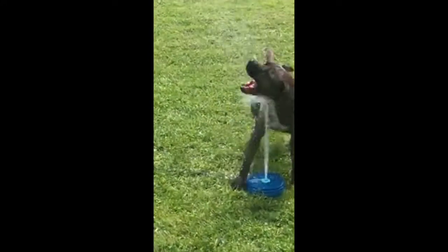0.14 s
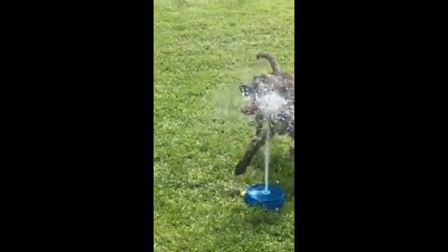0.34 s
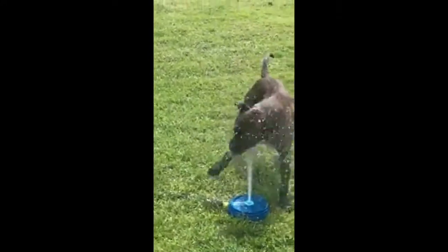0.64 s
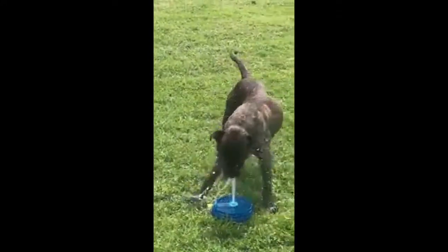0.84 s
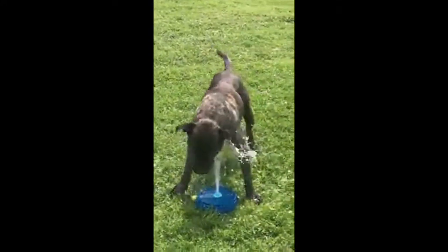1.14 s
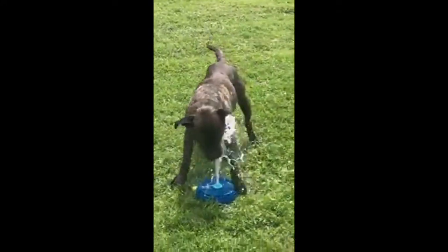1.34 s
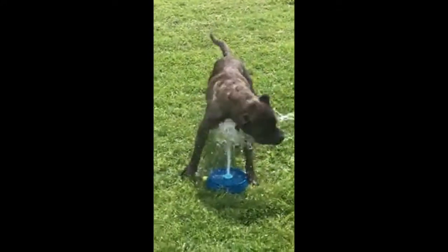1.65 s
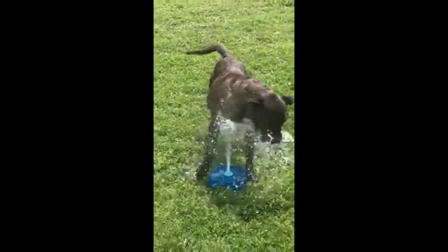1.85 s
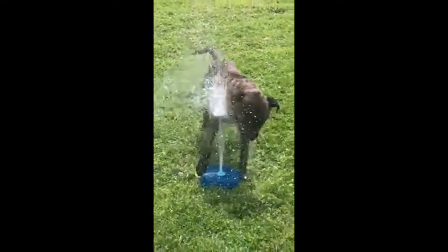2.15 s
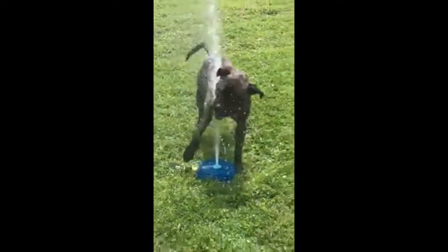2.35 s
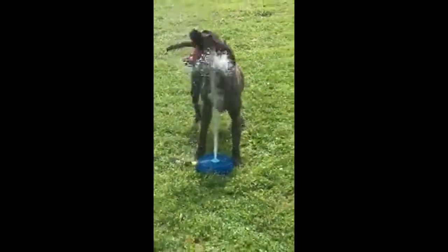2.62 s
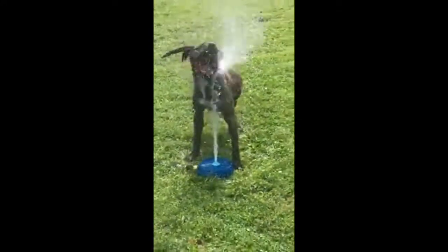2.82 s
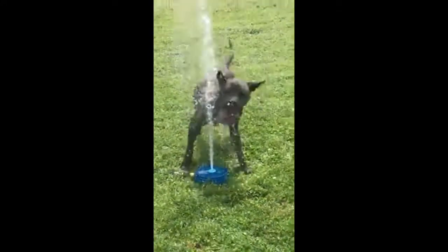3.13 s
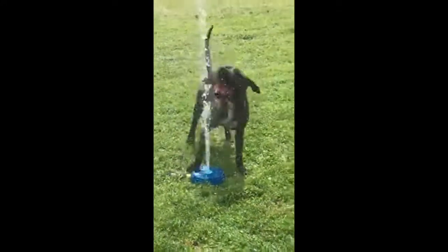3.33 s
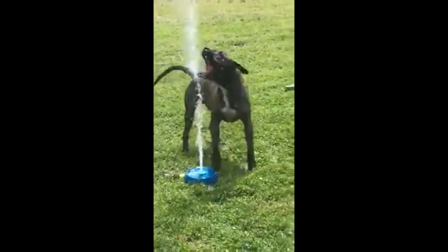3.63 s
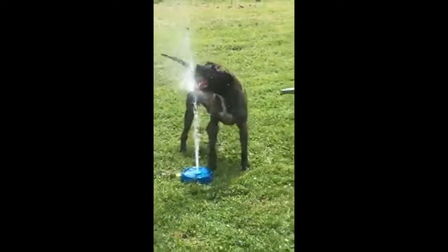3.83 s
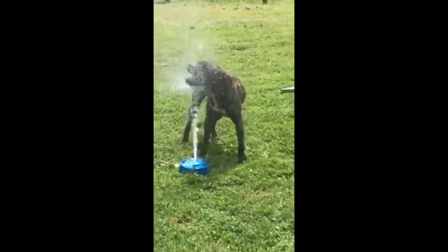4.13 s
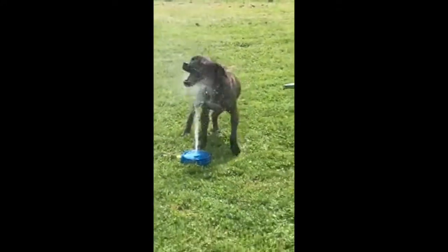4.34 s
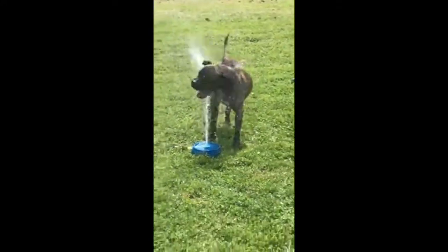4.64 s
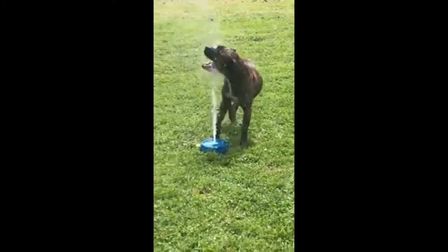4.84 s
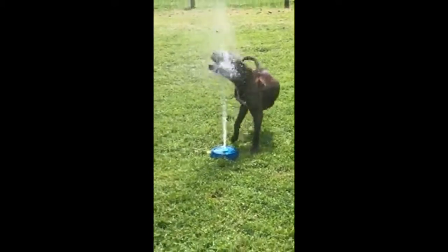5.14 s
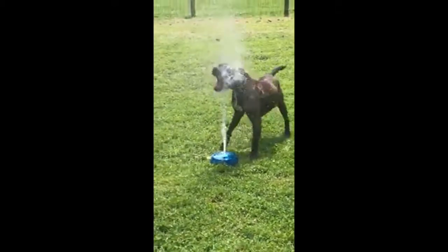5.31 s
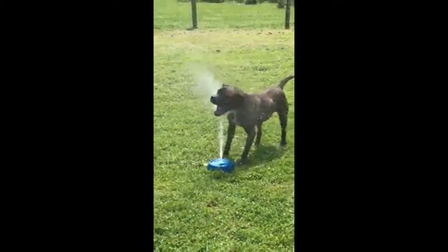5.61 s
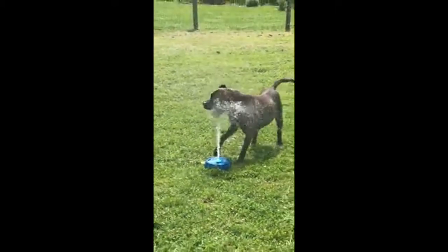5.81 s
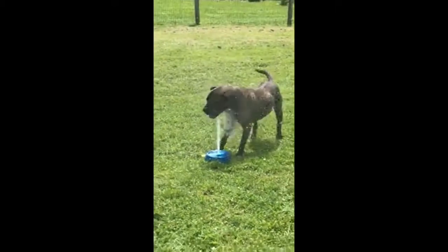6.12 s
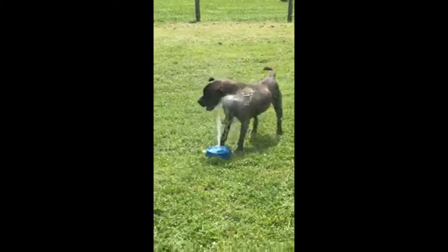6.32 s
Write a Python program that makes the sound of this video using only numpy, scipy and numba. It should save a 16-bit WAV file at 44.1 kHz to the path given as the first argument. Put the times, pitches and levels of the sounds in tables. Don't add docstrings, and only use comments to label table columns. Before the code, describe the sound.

Uneven spray from an upright water jet slaps and gushes against a dog's mouth and wet coat while low wind rumbles over the microphone.

```python
import sys
import numpy as np
from scipy import signal
from scipy.fft import rfft, irfft, dct, next_fast_len
from scipy.io import wavfile
from scipy.ndimage import uniform_filter1d
from numba import njit

SR = 44100
rng = np.random.default_rng(int(sys.argv[2]) if len(sys.argv) > 2 else 0)


def master_out(mix):
    frames = np.transpose(np.atleast_2d(mix))
    ceiling = np.clip(frames, -1, 1)
    pcm = np.round(ceiling * 32767).astype(np.int16)
    wavfile.write(sys.argv[1], SR, pcm)


def gain_from_db(level_db):
    decades = np.asarray(level_db, float) / 20
    return 10 ** decades


N = 285313


def rms_one(x):
    return x / np.sqrt(np.mean(x ** 2) + 1e-20)


def in_time(rows):
    s, *columns = np.transpose(rows)
    return [np.interp(np.arange(N) / SR, s, c) for c in columns]


def per_sample(slow):
    return np.interp(np.arange(N) / 64, np.arange(len(slow)), slow)


def band(x, low_hz, high_hz, order=2):
    return signal.sosfilt(signal.butter(order, [low_hz, min(high_hz, .45 * SR)], "band", fs=SR, output="sos"), x)


def colour(x, points):
    hz, db = np.transpose(points)
    grid = np.fft.rfftfreq(N, 1 / SR) + 1
    return irfft(rfft(x) * gain_from_db(np.interp(np.log(grid), np.log(hz), db)), N)


def drift(rate):
    r = np.exp(-80 * np.pi * rate / SR)
    slow = signal.lfilter([1], [1, -2 * r, r * r], rng.standard_normal(N // 40 + 2002))[2000:]
    return np.interp(np.arange(N) / 40, np.arange(len(slow)), rms_one(slow))


def swell(start, end):
    at, size = round(max(start, 0) * SR), round((end - start) * SR)
    return at, np.sqrt(np.sin(np.pi * (np.arange(size) + .5) / size))


def humps(middles, lengths, flat):
    t = np.arange(0, N + 64, 64) / SR - middles[:, None]
    return np.exp(-np.abs(2 * t / lengths[:, None]) ** flat)


def heap(base_db, shapes, peaks_db):
    bursts = per_sample(gain_from_db(peaks_db) ** 2 @ shapes ** 2)
    return 10 * np.log10(gain_from_db(base_db) ** 2 + bursts)


def steady(x, over_s):
    return x / np.sqrt(uniform_filter1d(x ** 2, size=round(over_s * SR)) + 1e-12)


def droplets(per_s, spread_db):
    sizes = gain_from_db(spread_db * np.minimum(rng.exponential(1, N), 4)) * rng.standard_normal(N)
    return rms_one(sizes * (rng.random(N) < per_s / SR))


@njit
def cavity(x, hz, r, sr):
    y = np.zeros(len(x))
    for i in range(2, len(x)):
        y[i] = x[i] - x[i - 2] + 2 * r * np.cos(2 * np.pi * hz[i] / sr) * y[i - 1] - r * r * y[i - 2]
    return y


def ring(drops, first_hz, last_hz, r):
    glide = np.linspace(first_hz, last_hz, len(drops))
    once = cavity(drops, glide, r, SR)
    return rms_one(cavity(once, glide, r, SR))


# time in seconds, spray level in dB, depth of the body in the jet in dB.
JET_ON_DOG = [(0, -47.5, -1), (.24, -48.5, -7.5), (.36, -42.5, -5), (.62, -39, -8), (.88, -43.5, -17.5),
              (1.0, -43, -18), (1.64, -48.5, -14.5), (2.11, -40.5, -4), (2.5, -42.5, -13.5),
              (2.69, -49.5, -7), (3.1, -40, -10), (3.3, -45, -2.5), (3.35, -55, -4), (3.77, -55, -2.5),
              (3.91, -42, -10), (4.74, -43.5, -1.5), (4.88, -50.5, -3.5), (5.3, -42.5, -8.5),
              (6.47, -46, -9)]
# middle in seconds, length in seconds, change in dB.
SURGES = [(0.6, 0.086, -0.5), (0.666, 0.071, 0), (0.812, 0.073, 3.5), (0.964, 0.071, 8), (1.26, 0.055, 0),
          (2.796, 0.096, 3.5), (3.083, 0.036, 0.5), (3.384, 0.046, 6.5), (3.843, 0.013, -5),
          (4.218, 0.068, 2.5), (5, 0.042, -2.5), (5.1, 0.095, 5.5), (5.352, 0.038, 3.5), (5.608, 0.061, 3),
          (5.853, 0.13, -1.5), (6.134, .1, 0), (6.314, 0.25, -2.5)]
# middle in seconds, length in seconds, slap level in dB,
# muzzle over slap in dB.
SPLASHES = [(0.005, 0.12, -55, 12.5), (0.432, 0.075, -41.5, -9.5), (0.52, 0.12, -46.5, -2.5),
            (0.704, 0.18, -40, -10), (0.932, 0.49, -47.5, -4), (1.103, 0.24, -45, -9.5),
            (1.221, 0.17, -42.5, -7), (1.374, 0.08, -46, 0.5), (1.484, 0.4, -49, 3.5),
            (1.708, 0.98, -50.5, -2.5), (2.04, 0.12, -44.5, -5.5), (2.23, 0.16, -44.5, -22),
            (2.867, 0.29, -48, -31), (3.17, 0.096, -42.5, -15), (3.286, 0.069, -42, -17),
            (3.398, 0.015, -51, -17), (4.27, 0.12, -45.5, 3.5), (4.405, 0.076, -46, -8), (4.61, .2, -57, 0),
            (5.057, 0.039, -52, -5), (5.19, 0.14, -53, -10), (5.683, 0.071, -43.5, -12),
            (6.265, 0.42, -53, -4)]


def jet_levels():
    spray_db, depth_db = in_time(JET_ON_DOG)
    s, length, change_db = np.transpose(SURGES)
    spray_db = spray_db + per_sample(change_db @ humps(s, length, flat=2.5))
    s, length, db, muzzle_over_db = np.transpose(SPLASHES)
    shapes = humps(s, length, flat=1.16)
    coat_db = heap(spray_db + 0.5 + 0.35 * depth_db, shapes, db - 6)
    slap_db = heap(spray_db + depth_db, shapes, db)
    low_db = -57 + 0.32 * (spray_db + depth_db + 53.5)
    muzzle_db = heap(low_db, shapes, db + muzzle_over_db)
    return spray_db, coat_db, slap_db, muzzle_db


def patches(x, patchy_db):
    edges = 1500 * 2 ** np.arange(0, 3.7, 1 / 3)
    out = np.zeros(N)
    for k, (low, high) in enumerate(zip(edges, edges[1:])):
        out += (-1) ** k * band(x, low, high) * gain_from_db(patchy_db * drift(4.0))
    return out


# time in seconds, lag in milliseconds, strength from 0 to 1.
ECHO = [(0, 1.1, 0.16), (.65, 1.22, 0.01), (.95, 0.87, 0.15), (1.2, 0.71, 0.07), (1.75, 0.89, 0.06),
        (2.2, 0.82, 0.3), (2.35, 1.3, 0.18), (2.8, 1.15, 0), (3.2, 1.05, 0.1), (3.6, 1.7, 0.5),
        (4.1, 1.3, .25), (4.4, 1.22, .3), (4.55, 1.15, .6), (4.72, 1.06, .65), (4.85, 1.0, .1),
        (5.9, 0.82, 0), (6.2, 0.72, 0.2), (6.47, 0.69, 0.3)]


def lawn_echo(x):
    lag_ms, strength = in_time(ECHO)
    strength = np.clip(strength * (1 + 0.61 * drift(6.5)), 0, 1)
    late = np.interp(np.arange(N) - lag_ms * SR / 1000, np.arange(N), x)
    dull = signal.sosfilt(signal.butter(1, 6000, fs=SR, output="sos"), late)
    return (x + strength * dull) / np.sqrt(1 + strength ** 2)


# frequency in Hz, density in dB per Hz.
JET_TONE = [(880, -35), (1500, 18), (2010, 5.5), (3120, 6.5), (4470, 3.5), (4880, -1.5), (6930, 3),
            (7640, -3), (8580, 1), (10200, 0), (11900, 3), (15400, -2)]


def spray():
    mist_db, coat_db, slap_db, _ = jet_levels()
    stream = droplets(22000, 1.6)
    drops = patches(colour(stream, JET_TONE[1:]), patchy_db=2.0)
    sputter = 0.07 * drift(24) + 2.0 * drift(110)
    mist = rms_one(band(drops, 7980, 20000, order=4)) * gain_from_db(mist_db + 0.3 * sputter)
    coat = rms_one(band(drops, 4933, 8300, order=4)) * gain_from_db(coat_db + 0.57 * sputter + .5 * drift(27))
    slap = rms_one(band(drops, 2170, 4780, order=4)) * gain_from_db(slap_db + 0.14 * sputter + 1.6 * drift(43))
    return mist + lawn_echo(coat + slap)


def muzzle():
    level_db = jet_levels()[3]
    dull_db = -66 + 0.72 * (level_db + 48.0)
    flat = rms_one(band(droplets(9000, 2.4), 862, 2140, order=3))
    dull = rms_one(band(droplets(9000, 1.8), 495, 690, order=3))
    return (gain_from_db(level_db) * flat + gain_from_db(dull_db) * dull) * gain_from_db(1.58 * drift(28))


# start in seconds, end in seconds, first pitch in Hz, last pitch in Hz, level in dB.
HOLLOWS = [(0, 0.084, 1050, 1040, -47), (0, 0.12, 1710, 1870, -50), (0.03, 0.142, 2460, 2600, -47.5),
           (0.41, 0.533, 633, 589, -48.5), (0.43, 0.52, 1150, 1250, -47), (0.51, 0.578, 1400, 1290, -45),
           (0.63, 0.737, 2980, 3340, -45), (0.63, 0.777, 3520, 3940, -48), (0.63, 0.73, 4540, 4600, -48),
           (0.64, 0.72, 2210, 2260, -56), (0.404, 0.52, 2440, 2500, -56), (0.027, 0.14, 3200, 3330, -48),
           (0.864, 0.935, 1800, 1690, -51), (1.485, 1.545, 2270, 2170, -46), (1.62, 1.742, 2520, 2450, -48),
           (3.136, 3.3, 1710, 1680, -60), (0.849, 0.983, 1170, 995, -43.5), (1.082, 1.338, 2710, 2980, -48),
           (1.34, 1.546, 1050, 970, -49), (1.333, 1.43, 2490, 2140, -43), (1.35, 1.562, 2800, 3030, -49),
           (1.617, 1.837, 1070, 1050, -48.5), (1.782, 2.11, 2270, 2500, -47),
           (1.822, 2.1, 3140, 3160, -46.5), (1.83, 2.02, 4300, 4140, -48), (3.137, 3.32, 3000, 3270, -47),
           (4.163, 4.236, 660, 700, -46), (4.213, 4.28, 880, 935, -44), (4.182, 4.31, 1290, 1480, -42.5),
           (4.198, 4.28, 2380, 2670, -42.5), (4.22, 4.29, 2160, 1950, -45),
           (4.515, 4.732, 1630, 2140, -49.5), (4.5, 4.74, 2500, 2770, -50), (4.4, 4.58, 3530, 3400, -52),
           (4.562, 4.736, 3330, 3940, -46.5), (4.57, 4.75, 4300, 4950, -60),
           (5.966, 6.114, 3900, 3450, -56), (6.186, 6.327, 2730, 2850, -50.5),
           (6.188, 6.328, 4050, 4050, -55)]


def hollows():
    out, drops, throb = np.zeros(N), droplets(6000, 2.5), gain_from_db(1.3 * drift(50))
    for start, end, first_hz, last_hz, db in HOLLOWS:
        width_hz = 190 + 0.012 * first_hz
        at, shape = swell(start, end)
        here = slice(at, at + len(shape))
        r = np.exp(-1.4 * np.pi * width_hz / SR)
        out[here] += gain_from_db(db) * shape * throb[here] * ring(drops[here], first_hz, last_hz, r)
    return out


# start in seconds, end in seconds, first pitch in Hz,
# last pitch in Hz, level in dB.
GUSHES = [(0, .12, 1700, 1900, -45), (0.438, .58, 1000, 1290, -51.5), (0.628, .74, 3240, 3450, -45),
          (.855, 0.963, 1430, 1200, -51), (1.338, 1.42, 2900, 2680, -42), (1.343, 1.43, 1910, 1800, -42),
          (1.34, 1.553, 1200, 1200, -55), (1.643, 1.817, 1410, 1200, -53), (2.0, 2.094, 2800, 2560, -48),
          (4.173, 4.297, 895, 1300, -52), (4.197, 4.308, 2180, 2500, -48), (4.37, 4.43, 3900, 3700, -46),
          (4.542, 4.57, 2200, 2200, -48)]


def gushes():
    width_hz, rise_s = 900, .008
    out, drops = np.zeros(N), droplets(3500, 3.0)
    r = np.exp(-np.pi * width_hz / SR)
    for start, end, first_hz, last_hz, db in GUSHES:
        at, size = round(max(start, 0) * SR), round((end - start) * SR)
        step = np.arange(size)
        drain = np.sqrt(np.cos(np.pi / 2 * step / size))
        shape = np.minimum(step / (rise_s * SR), 1) * drain
        out[at:at + size] += gain_from_db(db) * shape * ring(drops[at:at + size], first_hz, last_hz, r)
    return out


# time in seconds, peak in dB.
SNAPS = [(2.057, -22), (2.816, -40), (3.072, -36), (3.6375, -18), (3.6535, -33), (3.676, -35), (3.739, -45),
         (4.706, -25), (4.5328, -22), (4.553, -37), (5.3507, -32), (6.135, -34.5)]


def snaps():
    out, t = np.zeros(N), np.arange(400) / SR
    for s, peak_db in SNAPS:
        at = round(s * SR)
        burst = rng.standard_normal(400) * np.exp(-t / .0022)
        crack = band(burst, 2400, 3800) + .55 * band(burst, 4200, 6500) + .25 * band(burst, 6800, 9000)
        out[at:at + 400] += gain_from_db(peak_db - 5.5) * crack / np.abs(crack).max()
    return out


# time in seconds, level in dB, bite (how hard it flaps) in dB.
BREEZE = [(0, -43.5, -9), (.35, -47.5, 5), (.77, -48, -13), (.95, -32.5, -7), (1.5, -38.5, -14.5),
          (2.0, -31, -5.5), (2.2, -39.5, -13.5), (2.55, -32.5, -14), (3.0, -53, -5), (3.25, -64, 3),
          (3.45, -45, -13), (3.92, -50.5, -12), (4.4, -47, -7.5), (4.65, -39.5, -18), (4.95, -56, -4),
          (5.3, -50, -9), (5.75, -39, -18), (6.47, -41.5, 8)]
# middle in seconds, length in seconds, strength in dB, bite in dB.
GUSTS = [(0.125, 0.11, -35, -17), (0.894, 0.16, -51, -2), (4.037, 0.11, -42.5, -9),
         (5.585, 0.11, -45, -8.5), (0.297, 0.12, -30, -3.5), (0.472, 0.13, -33, -5.5),
         (0.625, 0.16, -39.5, -1), (1.097, 0.1, -30, 3.5), (1.227, 0.12, -27, -3), (1.388, 0.15, -30, -0.5),
         (1.542, 0.075, -38.5, -1), (1.65, 0.093, -34, -2), (1.752, 0.1, -27.5, -1.5),
         (1.818, 0.049, -22, -4), (1.892, 0.042, -31, -6), (2.045, 0.096, -32.5, 8.5),
         (2.376, 0.17, -33, -14), (2.656, 0.062, -30, 1), (2.8, 0.13, -22, -7), (2.924, 0.079, -23.5, -8),
         (3.057, 0.11, -32.5, -7.5), (3.125, 0.1, -29.5, -7.5), (3.285, 0.13, -33.5, -16),
         (5.952, .07, -36, -1.5), (4.263, 0.069, -36, -14), (4.51, 0.076, -32.5, -10),
         (4.584, 0.043, -28.5, -10.5), (4.711, 0.077, -33, -10.5), (4.818, 0.029, -39, -30),
         (5.875, 0.046, -23.5, -9), (6.115, 0.1, -27.5, -4.5), (6.317, 0.21, -27, -3.5),
         (6.48, 0.081, -29, 6.5)]
# middle in seconds, length in seconds, level in dB.
TEARS = [(0.28, .1, -58), (0.515, 0.027, -48.5), (1.229, 0.059, -44.5), (1.408, 0.047, -41),
         (1.682, 0.11, -48), (1.778, 0.11, -44.5), (2.027, 0.064, -60), (2.22, 0.13, -56),
         (4.95, 0.15, -58.5), (2.66, 0.047, -54), (2.803, 0.049, -45), (2.92, 0.05, -66),
         (3.03, 0.017, -41.5), (5.882, .05, -51), (5.938, 0.044, -52), (6.108, 0.072, -46),
         (6.238, 0.04, -41), (6.332, 0.095, -35.5), (6.45, 0.11, -38)]
# middle in seconds, length in seconds, level in dB.
THUMPS = [
    (0.27, 0.026, -26),
    (1.25, 0.033, -28),
    (1.813, 0.035, -20.5),
    (2.672, 0.045, -24),
    (2.915, 0.036, -24),
    (4.832, 0.049, -26.5),
    (5.893, 0.032, -32),
    (6.085, 0.099, -25),
    (6.29, 0.027, -33),
]


def wind_levels():
    breeze_db, breeze_bite_db = in_time(BREEZE)
    s, length, db, bite_db = np.transpose(GUSTS)
    buffet_db = heap(breeze_db, humps(s, length, flat=6.5), db)
    flap_db = heap(breeze_db + breeze_bite_db, humps(s, 1.04 * length, flat=4.5), db + bite_db)
    s, length, db = np.transpose(TEARS)
    flutter_db = heap(-56 + 0.64 * (flap_db + 32), humps(s, length, flat=6.2), db)
    s, length, db = np.transpose(THUMPS)
    deep_db = heap(-34.5 + 0.52 * (buffet_db + 32.5), humps(s, length, flat=4.9), db)
    return buffet_db, deep_db, flap_db, flutter_db


# frequency in Hz, density in dB per Hz.
WIND_TONE = [(12, -39), (20, -9), (54, 12.5), (81, 3), (183, -9.5), (236, -14), (375, -19.5), (499, -37.5),
             (780, -44.5), (900, -46), (1170, -63), (1980, -120)]


def wind():
    buffet_db, deep_db, flap_db, flutter_db = wind_levels()
    air, lumps = rms_one(colour(rng.standard_normal(N), WIND_TONE)), drift(37)
    deep = steady(band(air, 36, 78), 0.14) * gain_from_db(deep_db - 1.5 + 1.5 * lumps)
    buffet = steady(band(air, 78.8, 141.3, order=3), 0.072) * gain_from_db(buffet_db + 2.2 * lumps)
    flap = steady(band(air, 150, 255, order=3), 0.067) * gain_from_db(flap_db + 2.4 * lumps)
    flutter = steady(band(air, 410, 850, order=3), 0.054) * gain_from_db(flutter_db + 1.5 * lumps)
    pushed = .4 * np.tanh((deep + buffet + flap) / .4)
    return pushed + flutter


# time in seconds, peak in dB.
PUFFS = [
    (2.777, -26.5),
    (2.799, -26),
    (3.029, -46),
    (3.1406, -22),
    (3.609, -42),
]


def puffs():
    out, t = np.zeros(N), np.arange(1200) / SR
    for s, peak_db in PUFFS:
        at = round(s * SR)
        burst = rng.standard_normal(1200) * t ** 2 * np.exp(-t / 0.0014)
        push = band(burst, 120, 940)
        push = band(band(push, 110, 700, order=3), 110, 700, order=3)
        out[at:at + 1200] += gain_from_db(peak_db) * push / np.abs(push).max()
    return out


def drone():
    pitch_hz = 72.5 * (1 + .012 * drift(2.5))
    waver = gain_from_db(-43 + 3 * drift(4))
    return waver * np.sqrt(2) * np.sin(2 * np.pi * np.cumsum(pitch_hz) / SR)


# middle in seconds, length in seconds, level in dB.
PASSING = [
    (3.895, 0.53, -55),
]


def traffic():
    s, length, db = np.transpose(PASSING)
    roar = rms_one(band(rng.standard_normal(N), 255, 580))
    return per_sample(gain_from_db(db) @ humps(s, length, flat=1.8)) * roar


# start in seconds, end in seconds, pitch in Hz, level in dB.
PEEPS = [
    (3.492, 3.533, 3350, -52.5),
    (3.65, 3.678, 3330, -49),
    (3.722, 3.738, 7300, -55),
    (3.825, 3.852, 3300, -58),
]


def bird():
    out = np.zeros(N)
    for start, end, hz, db in PEEPS:
        at, shape = swell(start, end)
        whistle = np.sin(2 * np.pi * hz * np.arange(len(shape)) / SR)
        out[at:at + len(shape)] += gain_from_db(db) * shape ** 2 * whistle
    return out


def garden_floor():
    return gain_from_db(-62.5) * rms_one(band(rng.standard_normal(N), 110, 880))


def scene():
    water = spray() + muzzle() + hollows() + gushes() + snaps()
    air = wind() + puffs()
    return (water + air + drone() + traffic() + bird() + garden_floor())[None]


# middle in seconds, lowest thinned frequency in Hz,
# share of lines kept from 0 to 1.
THINNED = [(.16, 400, .14), (.4185, 450, .13), (.5272, 600, .22), (.6765, 600, .18), (.958, 400, .05),
           (.972, 400, .06), (1.1885, 600, .14), (1.679, 1500, .2), (1.978, 600, .13), (2.383, 600, .12),
           (2.639, 600, .14), (2.787, 700, .05), (2.852, 600, .14), (3.194, 350, .1), (3.75, 800, .1),
           (3.7675, 800, .1)]


def thin_to_lines(x):
    out, size = x.copy(), round(2048 / 48000 * SR)
    fade = np.sin(np.pi * (np.arange(size) + .5) / size)
    for s, low_hz, share in THINNED:
        at = round(s * SR) - size // 2
        lines = dct(x[0, at:at + size] * fade, norm="ortho")
        around = uniform_filter1d(lines ** 2, size=141) + 1e-20
        standing = uniform_filter1d(lines ** 2, size=11) / around
        thinned = np.arange(size) * SR / 2 / size > low_hz
        weak = standing < np.quantile(standing, 1 - share)
        change = np.where(weak, -.93, .4) * thinned
        out[0, at:at + size] += fade * dct(lines * change, type=3, norm="ortho")
    return out


def band_limit(x):
    return signal.sosfilt(signal.butter(12, 16630, fs=SR, output="sos"), x)


def record(dry):
    thin = signal.sosfilt(signal.butter(3, 42, "high", fs=SR, output="sos"), dry)
    size = next_fast_len(N + 4096)
    hz = np.fft.rfftfreq(size, 1 / SR)
    cut = irfft(rfft(thin, size) * (hz < 15740), size)[:, :N]
    return band_limit(thin_to_lines(cut))


dry = scene()
out = record(dry)
master_out(out)
```